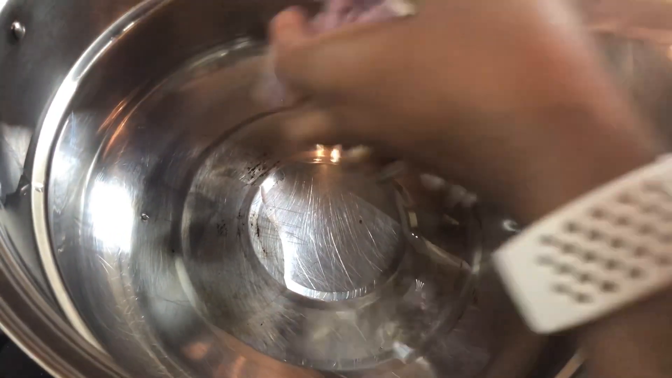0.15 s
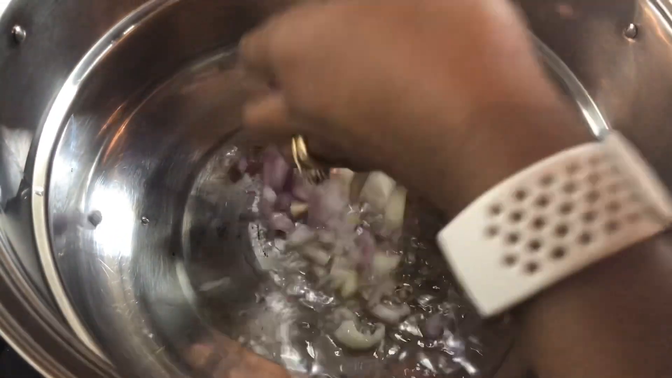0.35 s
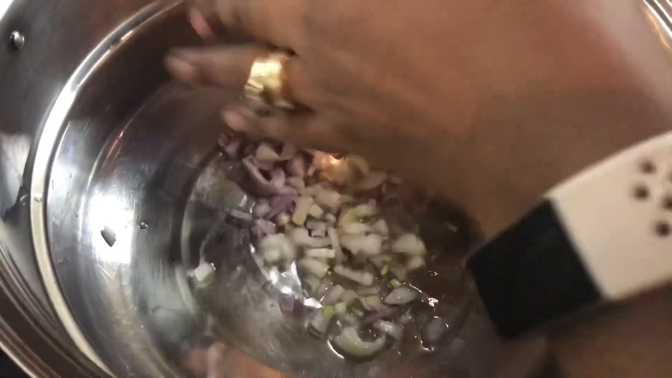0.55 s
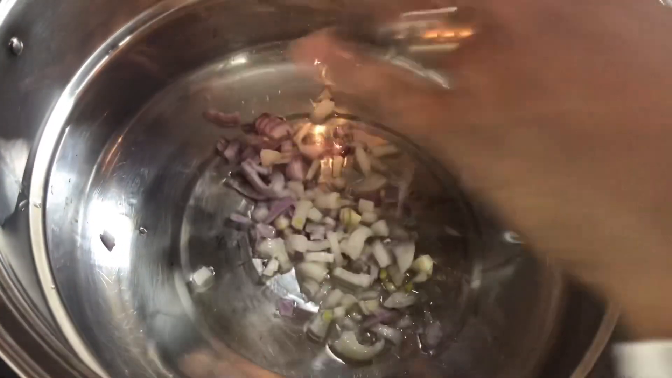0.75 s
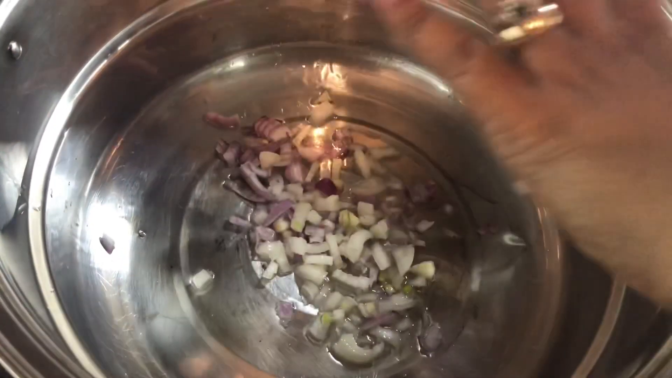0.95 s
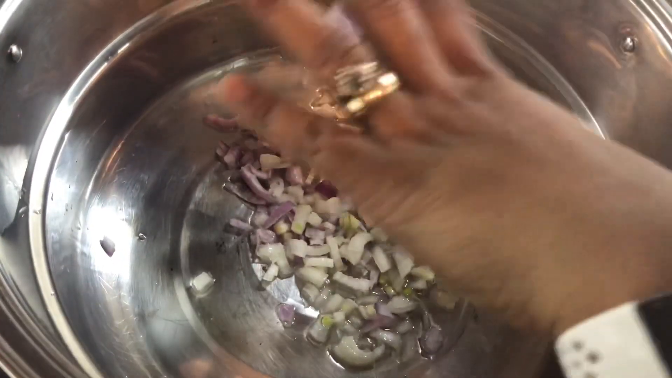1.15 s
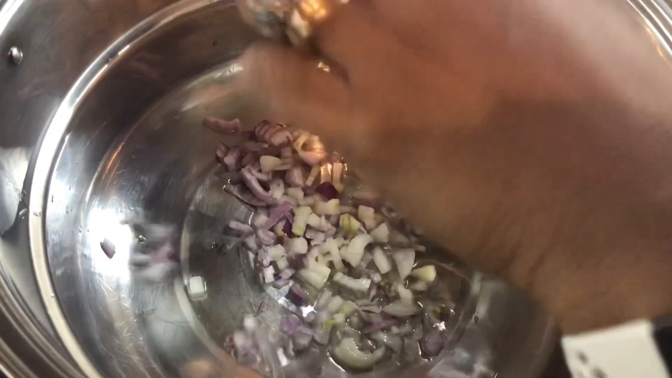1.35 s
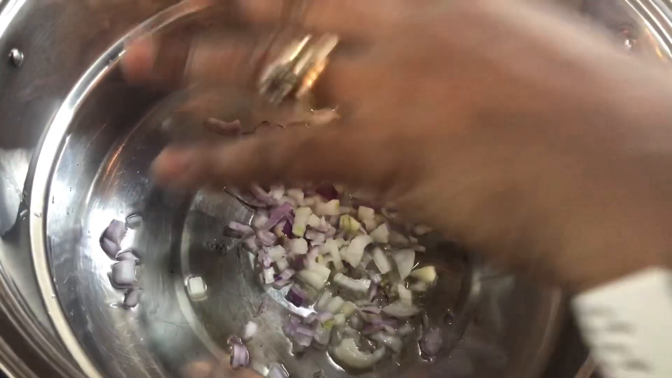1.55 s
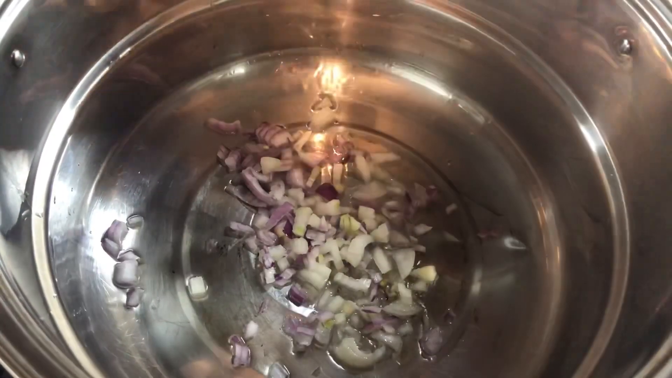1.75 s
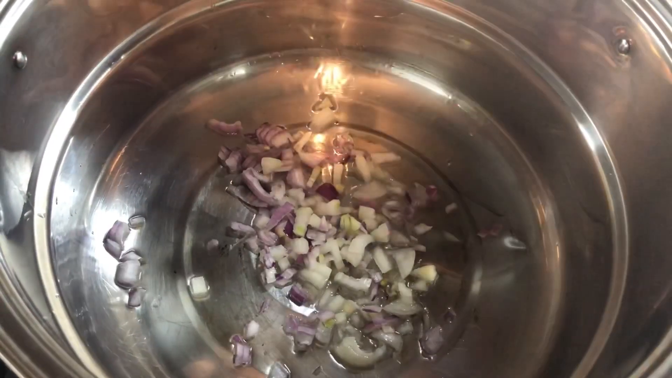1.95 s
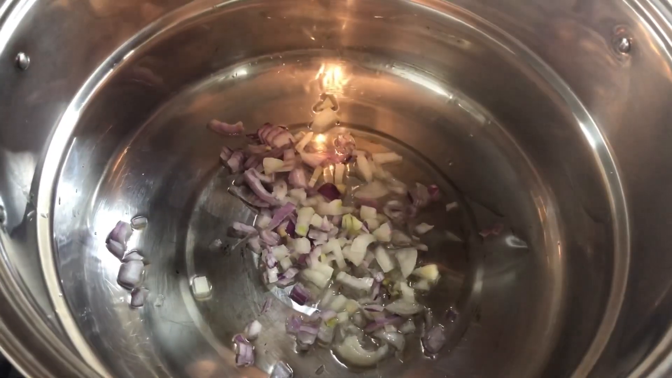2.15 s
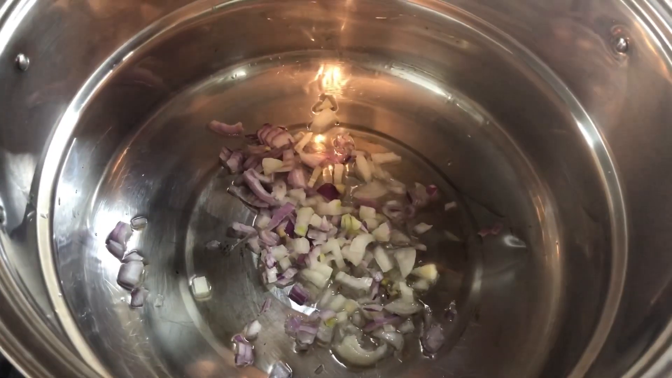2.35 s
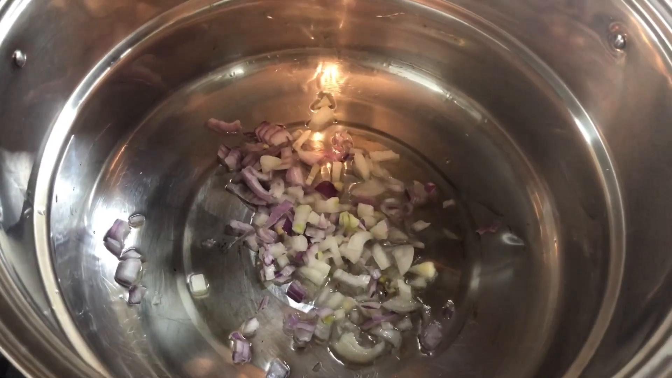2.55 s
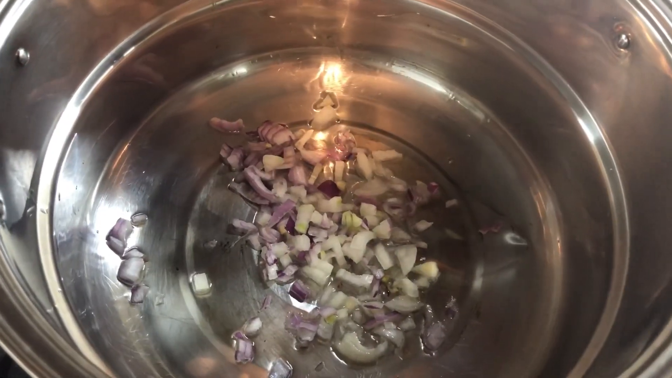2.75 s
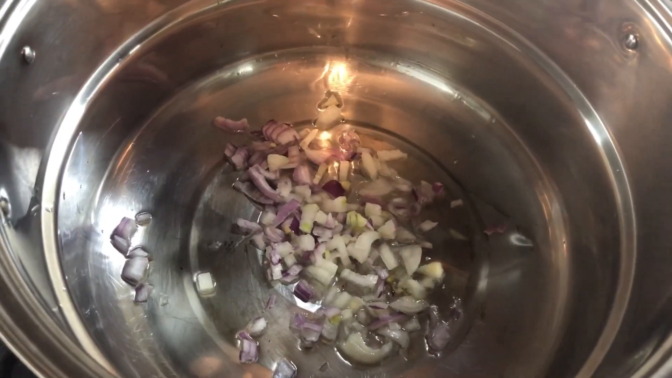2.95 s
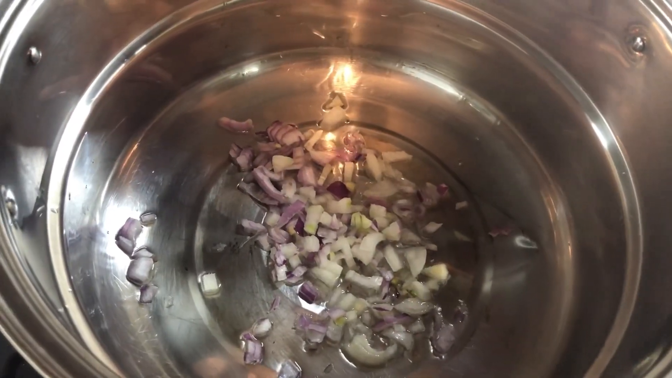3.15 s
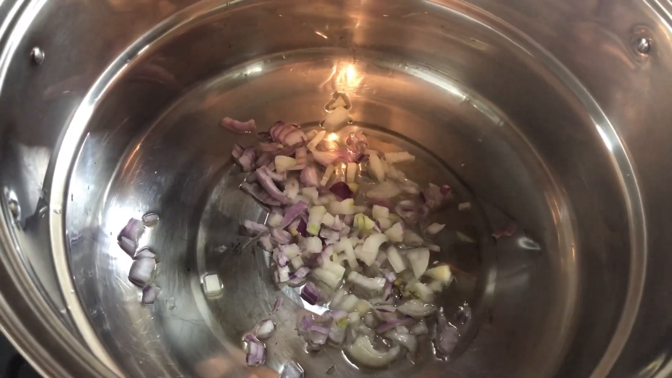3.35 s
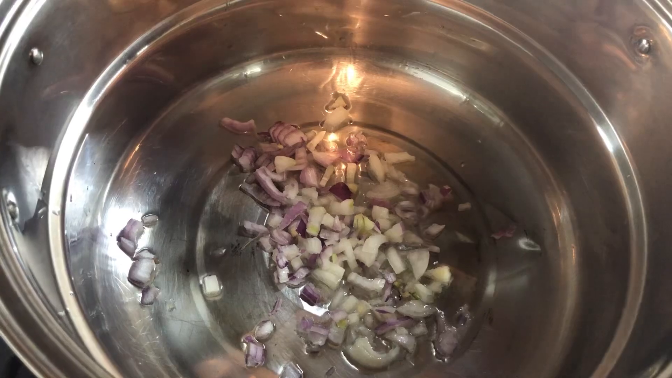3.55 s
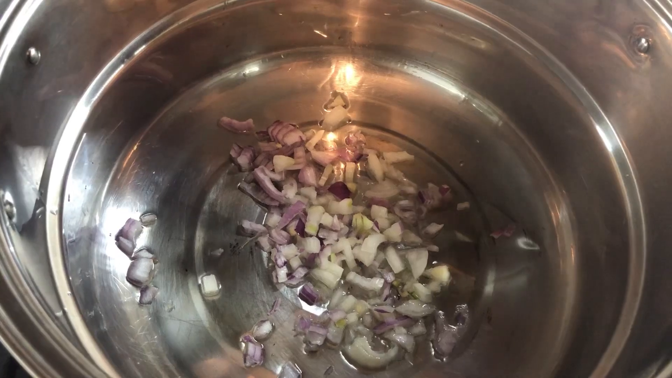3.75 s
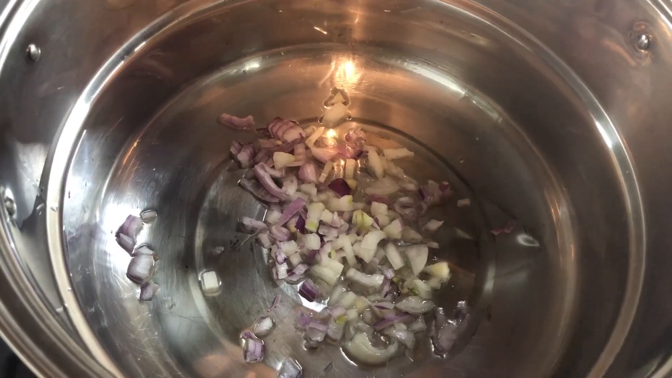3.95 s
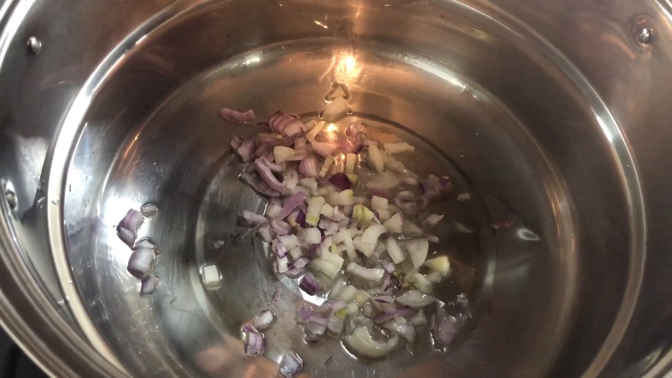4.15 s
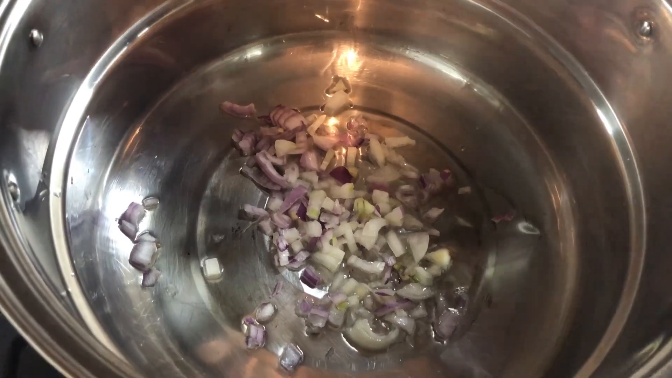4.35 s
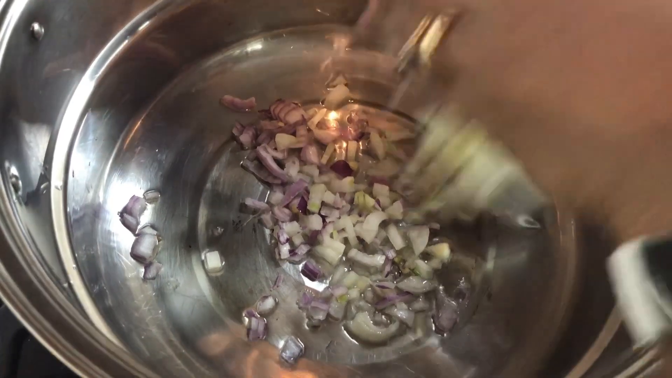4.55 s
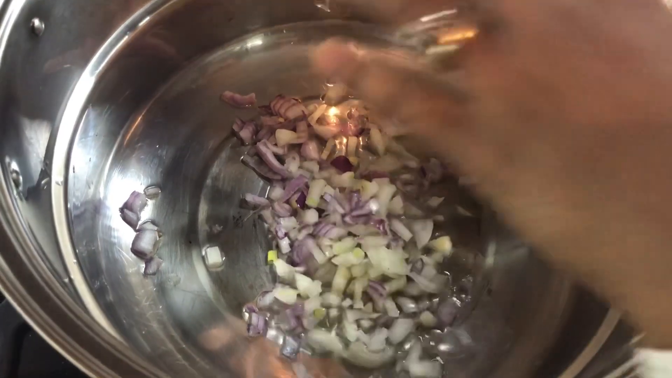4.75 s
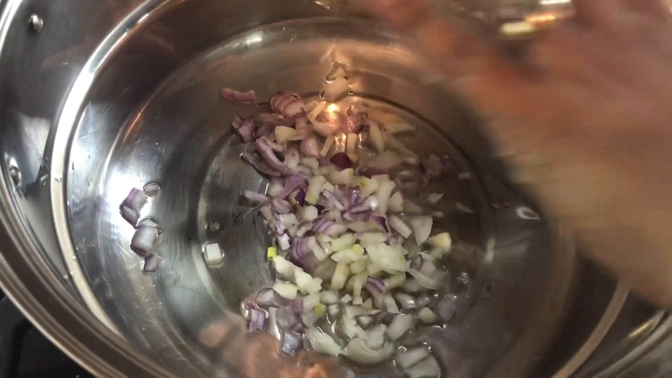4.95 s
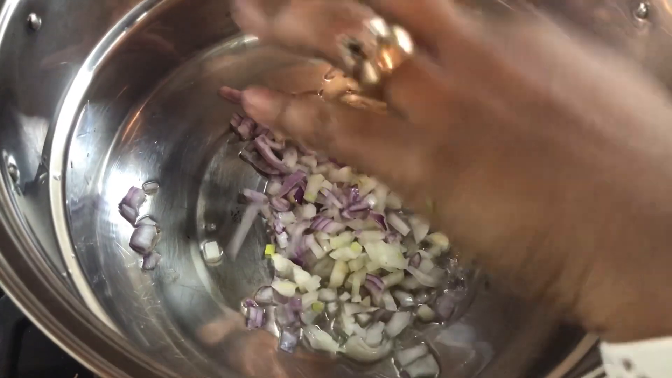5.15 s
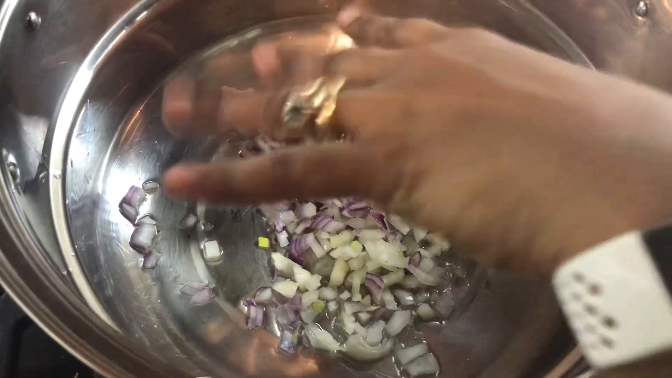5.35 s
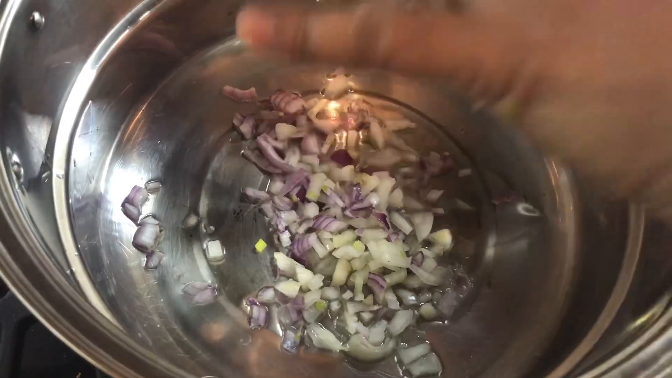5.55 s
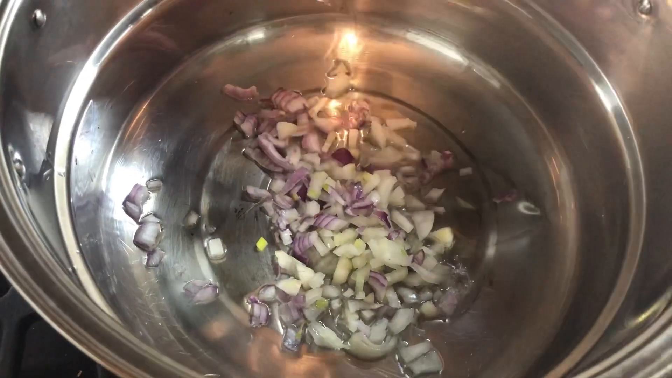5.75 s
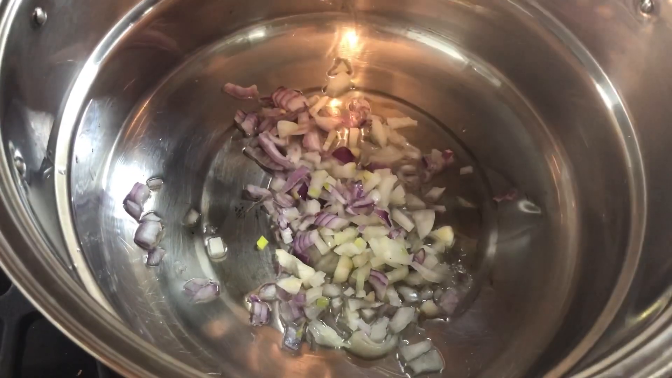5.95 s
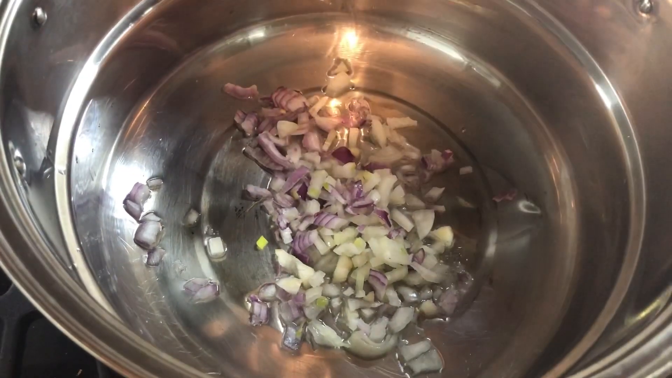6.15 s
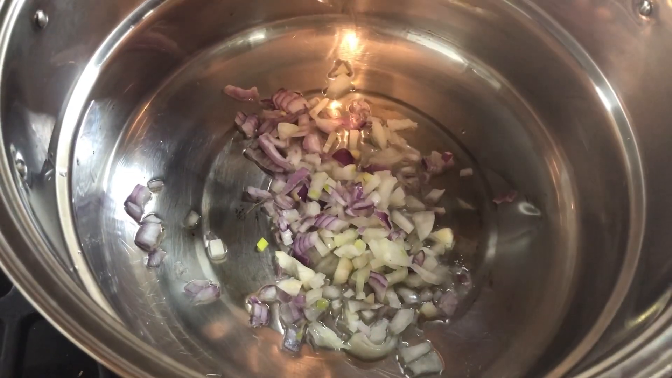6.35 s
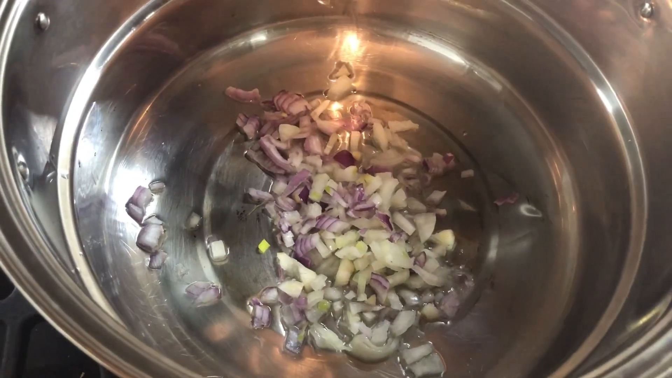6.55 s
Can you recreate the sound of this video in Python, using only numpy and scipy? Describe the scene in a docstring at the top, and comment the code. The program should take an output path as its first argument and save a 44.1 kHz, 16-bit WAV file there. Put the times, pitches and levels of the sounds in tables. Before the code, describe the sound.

Wet onion pieces thud into a wide metal pot, oil flaring into crackling sizzle, with occasional dry knife clacks and woody scrapes beside the stove.

```python
"""At a kitchen stove, handfuls of chopped onion drop into hot oil in a wide steel pot, heard close up.
The pieces thud on the base with short noise bursts, a boom of the air in the pot and ringing steel.
Their water boils off in a bright sizzle made of countless tiny clicks, and single droplets snap.
Beside the stove a knife clacks down on a board three times and scrapes up more onion, in tiny slips
that ring wood and steel. Low swells of the counter, a burner's soft rush and a faint hum lie below."""
import sys
import numpy as np
from scipy import signal
from scipy.fft import rfft, irfft, next_fast_len
from scipy.io import wavfile
from scipy.ndimage import map_coordinates

SR = 44100
rng = np.random.default_rng(int(sys.argv[2]) if len(sys.argv) > 2 else 0)


def put_to_file(sound):
    """Save the sound as 16-bit audio at rate SR, in the file named by the first command-line argument."""
    columns = np.atleast_2d(sound).T  # one column per channel
    safe = np.clip(columns, -1, 1)
    whole_steps = np.round(safe * 32767)
    wavfile.write(sys.argv[1], SR, whole_steps.astype(np.int16))


N = 290619

# The burner's rush. Each row: frequency in Hz, relative level in dB per Hz.
BURNER_SPECTRUM = [(20, -16), (45, -21), (100, 4.5), (180, -2), (245, 10), (340, -3), (420, -7),
                   (900, -9.5), (1500, -19.5), (5000, -21), (16000, -27.5)]
# The mains hum. Each row: frequency in Hz, level in dB.
HUM_TONES = [(48.6, -75), (97, -73)]

# Wet onion meets the oil and steam flares up. Each row: start in seconds, first flash in dB,
# lasting sizzle in dB, finest spray in dB against the sizzle (all before a fixed trim).
STEAM_FLARES = [(0.162, -46.5, -48, -9), (0.22, -41, -35.5, -2), (0.296, -28, -34, -1.5),
                (0.395, -27, -35, -2), (0.756, -33.5, -37, 0.5), (1.269, -29, -52, -0.5),
                (4.29, -45, -69, -3), (4.69, -39, -51.5, -1.5), (5.19, -41, -69, -2)]
# The sizzle. Each row: frequency in Hz, relative level in dB per Hz.
SIZZLE_SPECTRUM = [(880, -33), (1500, -30), (2000, -13.5), (2100, -9.5), (2290, -15), (2580, -10.5),
                   (3200, -6), (3640, -6), (4480, -0.5), (5620, 0.5), (12600, -5.5), (14000, -2.5),
                   (15800, -6.5)]
# The low simmer. Each row: frequency in Hz, relative level in dB per Hz.
SIMMER_SPECTRUM = [(120, -31), (300, -1.5), (450, -2), (650, -4), (1100, -2), (1500, 1), (2200, -11.5)]
# The air in the pot. Each row: frequency in Hz, width in Hz, relative level in dB.
POT_AIR = [(390.5, 43, -2), (855.5, 32.5, 3.5), (1281, 69, -5), (1750, 160, -7.5), (2310, 300, -10.5)]
# The soft ringing of that air. Each row: time in seconds, level in dB.
AIR_LEVEL = [(0.2, -47.5), (2.0, -56.5), (4.3, -57.5), (5.3, -53.5), (5.52, -51), (5.85, -54.5),
             (6.59, -53)]

# Heavier clumps of onion landing. Each row: start in seconds, strength in dB, favoured pitch in Hz.
CLUMPS = [(0.166, -29.5, 794), (0.22, -12, 391.4), (0.235, -12.5, 789), (0.271, -13.5, 380),
          (0.283, -12.5, 1320), (0.298, -13.5, 390), (0.366, -17, 369), (0.393, -14, 395),
          (0.411, -17.5, 369), (0.461, -18, 377), (0.487, -14, 580), (0.533, -15, 630), (0.767, -21.5, 404),
          (0.794, -21.5, 584), (0.826, -19, 603), (1.192, -26, 385), (1.222, -20.5, 377), (1.265, -16, 382),
          (1.28, -19, 460), (1.301, -17.5, 383), (4.623, -20.5, 810), (4.633, -15.5, 370),
          (4.665, -21, 380), (4.686, -24.5, 388), (5.187, -19, 850)]
# Handfuls of loose pieces. Each row: start in seconds, end in seconds, typical strength in dB,
# middle favoured pitch in Hz.
HANDFULS = [(0.24, 0.38, -16, 700), (4.607, 4.67, -24.5, 593), (5.177, 5.25, -29.5, 404)]
# How much onion cushions a landing, already thick for the first handful.
# Each row: time in seconds, cover from 0 to 1.
ONION_BED = [(0.6, 0.66), (1.25, 0.74), (4.6, 1)]
# The thud of a clump. Each row: frequency in Hz, relative level in dB per Hz.
THUD_SPECTRUM = [(30, -60), (55, -40), (85, -22), (140, -6), (400, -3.5), (800, -7.5), (1300, -3),
                 (2200, -12), (5000, -12.5), (12000, -34)]
# The steel base. Each row: frequency in Hz, relative level in dB, seconds to fade by 60 dB.
STEEL_BASE = [(136.2, 0.5, 0.43), (249, -1, 0.3), (291, -13, 0.53), (374, 1, 0.46), (396.6, 4.5, 0.33),
              (586, -3.5, 0.81), (584, 0.5, 0.26), (653, -8, 0.37), (785.5, 2, 0.17), (854, -32, 0.38),
              (1098, -1, 0.17), (1295, 3.5, 0.24), (1487, -19, .45), (1646, -5, 0.27), (2120, -9, 0.35)]

# The loudest droplets bursting in the oil. Each row: start in seconds, level in dB, pitch in Hz,
# lower tick in dB against the snap.
LOUD_SPITS = [(0.1662, -32, 4940, -22), (0.7761, -15.5, 9700, -12), (0.964, -14.5, 7800, -16.5),
              (1.0706, -23, 9400, -12), (1.1244, -21, 10400, -20), (1.1896, -19, 9300, -15),
              (1.2775, -17, 9400, -9.5), (1.3129, -16, 8300, -17), (1.3395, -18, 10900, -19),
              (1.4345, -18, 11500, -27), (1.472, -18, 7900, -11.5), (1.6628, -23, 10500, -28),
              (1.7238, -23.5, 7860, -22), (2.0283, -24, 10700, -9), (2.1359, -27.5, 8800, -15),
              (3.1259, -30, 5900, -14), (3.433, -24, 7200, -26), (4.0295, -32.5, 11100, -5.5),
              (4.1127, -28.5, 8700, -8), (4.2945, -31, 8400, -17), (4.3262, -31, 7450, -3),
              (4.479, -30.5, 10400, -8), (4.8841, -27, 8600, -9.5), (4.7052, -20, 10800, -15.5),
              (4.76, -24, 10500, -14), (4.7863, -20, 9800, -25), (5.1384, -27, 9000, -16),
              (5.2317, -30, 6000, -6.5), (5.2565, -28, 9700, -18), (5.303, -15.5, 10000, -20),
              (5.3773, -18, 10700, -17), (5.3991, -20.5, 8800, -14), (5.817, -25.5, 6500, -12.5),
              (6.4284, -35.5, 8000, 1)]

# Heavier contacts shake the counter. Each row: start in seconds, strength in dB.
COUNTER_HITS = [(0.28, -39), (0.48, -36), (1.269, -36), (2.232, -40), (3.023, -35.5), (4.631, -27.5),
                (4.674, -38), (6.05, -37), (6.26, -33.5)]
# The counter. Each row: frequency in Hz, relative level in dB, seconds to fade by 60 dB.
COUNTER_MODES = [(83, -1, 0.21), (104, -6.5, 0.21), (133, -5.5, 0.16)]

# The knife meeting the board. Each row: start in seconds, strength in dB, brightness in Hz.
KNIFE_KNOCKS = [(2.2280, -10, 1420), (3.02, -12, 1330), (3.0244, -12, 1050), (6.047, -18, 1160)]
# The board when knocked. Each row: frequency in Hz, width in Hz, relative level in dB.
KNOCKED_BOARD = [(242, 88, -1.0), (490, 280, 1.5), (785, 25, 15.5), (850, 79, 10.5), (1250, 73, 4), (1757, 81, 5.5)]

# Strokes of the knife. Each row: start in seconds, end in seconds, steady drag in dB,
# time of the blade's bite in seconds, bite in dB, time of the hardest push in seconds, push in dB.
KNIFE_STROKES = [(2.294, 2.658, -37.5, 2.46, -36.5, 2.475, -26.5),
                 (3.093, 3.497, -37.5, 3.165, -33, 3.2, -34.5), (6.122, 6.493, -43, 6.185, -47, 6.275, -49)]
# The board when scraped. Each row: frequency in Hz, width in Hz, relative level in dB.
SCRAPED_BOARD = [(268, 65, -13.5), (413, 110, -10), (585, 44, -5.5), (739, 120, -10), (967, 64, 2),
                 (1060, 49, -4.5), (1124, 34, -4), (1310, 60, -5), (1650, 130, -12.5), (2145, 88, -9.5)]
# The blade. Each row: frequency in Hz, width in Hz, relative level in dB.
BLADE_MODES = [(1668, 55, 0), (1800, 90, -11), (2130, 90, -10), (2720, 240, -11), (3250, 200, -14),
               (3860, 400, -12), (4800, 700, -16)]

FLARE_ATTACK_S, FLASH_FALL_DB_PER_S = 0.002, 75
DRYING_S, DRYING_POWER = 0.5, 1.39  # the lasting sizzle thins out as a power of its age
SPRAY_FALL_DB_PER_S = 1.77  # the finest spray goes first

RING_DB, RING_MUTE_DB = -8, 23.5  # the bare steel base, and its loss under a full bed of onion
PIECES_PER_S, PIECE_SPREAD_DB = 40, 1

SMALL_SPITS_PER_S = 10
SMALL_SPIT_DB, SMALL_SPIT_SPREAD_DB = -36.5, 0.5  # typical level in a sizzle of median strength
SMALL_SPIT_GROWS = 0.7  # dB they gain for each dB of sizzle
SMALL_SPIT_HZ, SMALL_TICK_DB = 9700, -17  # middle pitch; tick against the snap

STROKE_ATTACK_S, STROKE_RELEASE_S = 0.035, 0.042
BLADE_DRAG_DB = -10.5  # steel against wood while the blade drags on
SPOT_DB, SPOTS_PER_S = 1.8, 11  # the travelling blade favours now one resonance, now another
BITE_LIFT = 0.17  # share of the drag that the wood loses while only the edge bites
PUSH_RISE_S, PUSH_FALL_S, BITE_WIDTH_S = 0.1, 0.016, 0.045
CHATTER_HZ, CHATTER_WIDTH_HZ = 1050, 450  # a hard push drives mostly the board's middle resonances

TOP_HZ = 15950  # nothing is kept from here up


def amp(db):
    """Turn decibels into a gain."""
    return 10 ** (np.asarray(db) / 20)


def unit(x):
    """Scale x to an average (rms) strength of 1."""
    return x / np.sqrt(np.mean(x ** 2) + 1e-20)


def seconds(size):
    """Give the times of that many samples."""
    return np.arange(size) / SR


def wobble(rate):
    """Draw a smooth random curve with that many knots a second."""
    knots = rng.standard_normal(int(N * rate / SR) + 4)
    return map_coordinates(knots, [seconds(N) * rate])


def add(track, s, sound):
    """Mix a sound into the track at time s."""
    part = track[max(round(s * SR), 0):][:len(sound)]
    part += sound[:len(part)]


def filtered(x, response):
    """Multiply the spectrum of x by a response, given as a function of frequency."""
    m = next_fast_len(len(x) + 8192)
    return irfft(rfft(x, m) * response(np.fft.rfftfreq(m, 1 / SR)), m)[:len(x)]


def colour(points):
    """Make a tone colour by joining spectrum points along a log frequency axis."""
    hz, db = np.transpose(points)
    return lambda f: amp(np.interp(np.log(f + 1), np.log(hz), db))


def resonances(modes):
    """Make a body that rings at its own frequencies; neighbours have opposite signs."""
    def response(f):
        return sum((-1) ** k * amp(db) * 1j * f * width / (hz * hz - f * f + 1j * f * width)
                   for k, (hz, width, db) in enumerate(modes))
    return response


def grains(rate, spread_db):
    """Scatter tiny clicks at random times, with a few larger than the rest."""
    size = amp(spread_db * np.minimum(rng.exponential(size=N), 6))
    present = rng.random(N) < rate / SR
    return unit(present * size * rng.choice([-1, 1], N))


def walls(first, echo, t60):
    """Follow a direct click with quick scatter from the steel wall of the pot."""
    t = seconds(size=1400)
    fade = amp(-60 * t / t60) + amp(-15 - 60 * t / .04)
    scatter = rng.standard_normal(len(t)) * (t > first) * fade
    return (t == 0) + echo * scatter / np.linalg.norm(scatter)


def burst(hz, echo, t60):
    """Burst a bubble: a snap up to an octave and a half wide, scattered in the pot."""
    edges = [hz / 1.7, min(1.7 * hz, 17000)]
    band = signal.butter(2, edges, "bandpass", fs=SR, output="sos")
    snap = signal.sosfilt(band, 1. * (seconds(size=100) == 0))
    return signal.fftconvolve(snap, walls(first=.0004, echo=echo, t60=t60))


def kitchen():
    """The burner's soft rush is coloured noise; the faint mains hum is steady tones."""
    rush = unit(filtered(rng.standard_normal(N), colour(BURNER_SPECTRUM)))
    hum = sum(amp(db) * np.sqrt(2) * np.sin(2 * np.pi * hz * seconds(N)) for hz, db in HUM_TONES)
    return amp(-59.5) * rush + hum


def boiling():
    """Trace sizzle and finest spray in dB: each flare flashes, then dries slowly."""
    power, finest_db = np.full(N, 1e-12), np.full(N, 1e-12)
    for s, flash_db, lasting_db, spray_db in STEAM_FLARES:
        age = np.maximum(seconds(N) - s, 0)
        flash = amp(flash_db - FLASH_FALL_DB_PER_S * age) ** 2
        lasting = amp(lasting_db) ** 2 / (1 + age / DRYING_S) ** DRYING_POWER
        power = power + np.minimum(age / FLARE_ATTACK_S, 1) * (flash + lasting)
        # the newest flare sets the spray
        finest_db = np.where(age > 0, spray_db - SPRAY_FALL_DB_PER_S * age, finest_db)
    return 10 * np.log10(power), finest_db


def crackle(count, pitch_hz):
    """Sum families of small bubbles, each with its own pitch and scatter in the pot."""
    pitches = np.clip(pitch_hz * np.exp(.35 * rng.standard_normal(count)), 2500, 14500)
    total = np.zeros(N)
    for hz in pitches:
        pops = grains(rate=40, spread_db=3.7)
        total += signal.oaconvolve(pops, unit(burst(hz, echo=1.0, t60=0.0075)))[:N]
    return unit(total)


def sizzle():
    """Steam escapes through oil as tiny bubbles and a crackle of larger ones; fresh onion is brighter."""
    sizzle_db, spray_db = boiling()
    surge_db = 0.13 * wobble(7) + .5 * wobble(25) + 0.49 * wobble(140)
    fizz = unit(filtered(grains(rate=7000, spread_db=2.8), colour(SIZZLE_SPECTRUM)))
    bubbles = fizz + amp(-6) * crackle(count=14, pitch_hz=7500)
    # the spray is the treble, fading in from 8 to 11 kHz
    spray = filtered(bubbles, lambda f: np.clip((f - 8000) / 3000, 0, 1))
    return amp(sizzle_db + surge_db + 1.86) * (bubbles - spray + amp(spray_db + 2.0) * spray)


def hollow():
    """Larger bubbles simmer low and keep the air in the pot ringing softly."""
    sizzle_db, _ = boiling()
    air_db = np.interp(seconds(N), *np.transpose(AIR_LEVEL))
    air = unit(filtered(rng.standard_normal(N), resonances(POT_AIR)))
    simmer = unit(filtered(grains(rate=1700, spread_db=0.5), colour(SIMMER_SPECTRUM)))
    started = seconds(N) > STEAM_FLARES[0][0]
    return started * (amp(air_db) * air + amp(sizzle_db - 14.5) * simmer)


def loose_pieces():
    """Single pieces fall at uneven moments for as long as a handful is poured."""
    pieces = []
    for start, end, db, hz in HANDFULS:
        times = np.arange(start, end, 1 / PIECES_PER_S)
        chance = rng.standard_normal(size=(20, 3))
        for s, (late, strong, high) in zip(times, chance):
            moment = s + .2 * late / PIECES_PER_S
            pieces.append((moment, db + PIECE_SPREAD_DB * strong, hz * np.exp(0.66 * high)))
    return pieces


def landings():
    """Wet clumps patter down: a dull thud, a boom of the air in the pot and a ring of its base."""
    out, t = np.zeros(N), seconds(size=SR // 2)
    rise = 1 - np.exp(-t / 0.004)
    for s, db, hz in CLUMPS + loose_pieces():
        # the spot where a clump lands favours some modes over others
        favour = lambda f: amp(-2.6 * np.abs(np.log2((f + 1) / hz)))
        # a bed of onion dulls the blow, mutes the steel and leaves mostly the boom
        cover = np.interp(s, *np.transpose(ONION_BED))
        cushion = lambda f: 1 / np.sqrt(1 + (cover * f / 750) ** 4)

        fade = amp(-60 * t / 0.058) + amp(-22 - 60 * t / .45)
        patter = rng.standard_normal(len(t)) * rise * fade
        thud = filtered(patter, lambda f: colour(THUD_SPECTRUM)(f) * favour(f) * cushion(f))

        air = [(f, width, level - (6 + 6 * cover) * abs(np.log2(f / hz))) for f, width, level in POT_AIR]
        boom = filtered(1. * (t == 0), resonances(air))

        ring = np.zeros(len(t))
        chance = rng.standard_normal((len(STEEL_BASE), 2))
        for (f, level, t60), (strong, phase) in zip(STEEL_BASE, chance):
            strength = favour(f) ** 1.4 * amp(level + 2 * strong - 60 * t / t60)
            ring += strength * np.sin(2 * np.pi * (f * t + phase))

        add(out, s, amp(db - 13 - 7.4 * cover) * thud / np.std(thud[:600]))
        add(out, s, amp(db - 7.5 + 2.4 * cover) * boom / np.abs(boom).max())
        add(out, s, amp(db + RING_DB - RING_MUTE_DB * cover) * rise * ring)
    # the pot is too small to radiate deep bass
    return signal.sosfilt(signal.butter(4, 80, "highpass", fs=SR, output="sos"), out)


def small_spits():
    """Lesser droplets go off at random, stronger where the sizzle is fiercer."""
    sizzle_db, _ = boiling()
    usual_db = SMALL_SPIT_DB + SMALL_SPIT_GROWS * (sizzle_db - np.median(sizzle_db))
    gaps, chance = rng.exponential(size=120), rng.standard_normal(size=(120, 2))
    times = STEAM_FLARES[0][0] + np.cumsum(gaps) / SMALL_SPITS_PER_S
    droplets = []
    for s, (strong, high) in zip(times, chance):
        if s < N / SR:
            db = usual_db[int(s * SR)] + SMALL_SPIT_SPREAD_DB * strong
            droplets.append((s, db, SMALL_SPIT_HZ * np.exp(0.27 * high), SMALL_TICK_DB))
    return droplets


def spits():
    """Single droplets explode with a sharp snap and a lower tick."""
    out = np.zeros(N)
    for s, db, hz, tick_db in LOUD_SPITS + small_spits():
        snap = burst(hz, echo=.9, t60=.006)
        tick = burst(hz / 3.2, echo=1.2, t60=.012)
        # both are levelled by their first 3 ms
        pop = snap / np.std(snap[:132]) + amp(tick_db) * tick / np.std(tick[:132])
        add(out, s, amp(db) * pop)
    return out


def thumps():
    """The counter answers a heavy contact with a short low swell of fading tones."""
    out, t = np.zeros(N), seconds(size=SR // 2)
    swell = (1 - np.exp(-t / 0.019)) ** 2
    for s, db in COUNTER_HITS:
        modes = sum(amp(level - 60 * t / t60) * np.sin(2 * np.pi * (hz * t + rng.random()))
                    for hz, level, t60 in COUNTER_MODES)
        add(out, s, amp(db) * swell * modes)
    return out


def knocks():
    """The knife clacks drily on the board: brief noise, both plain and through the ringing wood."""
    out, t = np.zeros(N), seconds(size=SR // 2)
    for s, db, hz in KNIFE_KNOCKS:
        fade = amp(-60 * t / 0.019) + amp(-19.5 - 60 * t / 0.33)
        contact = rng.standard_normal(len(t)) * fade
        clack = filtered(contact, lambda f: resonances([(hz, 1.9 * hz, 0)])(f) ** 2 * (f < 3.2 * hz))
        body = filtered(contact, resonances(KNOCKED_BOARD))
        knock = amp(-13.0) * clack / np.std(clack[:300]) + amp(-18.5) * body / np.std(body[:600])
        add(out, s, amp(db) * knock)
    return out


def rubbed(modes, rate, spread_db):
    """Tiny slips ring a body; its resonances trade strength as the contact moves."""
    pulses, total = grains(rate, spread_db), np.zeros(N)
    for k, mode in enumerate(modes):
        strength = amp(SPOT_DB * wobble(SPOTS_PER_S))
        total += (-1) ** k * strength * filtered(pulses, resonances([mode]))
    return unit(total)


def scrapes():
    """The blade bites, is pushed home and drags over the board; tiny slips ring wood and steel."""
    out, t = np.zeros(N), seconds(N)
    slips = amp(1.5 * wobble(45))  # unevenness shared by all three layers
    wood = unit(slips * rubbed(SCRAPED_BOARD, rate=3100, spread_db=1.5))
    edge = unit(slips * rubbed(BLADE_MODES, rate=2500, spread_db=4.0))
    pushed_wood = rubbed(SCRAPED_BOARD, rate=3100, spread_db=1.5)
    middle = resonances([(CHATTER_HZ, CHATTER_WIDTH_HZ, 0)])
    chatter = unit(slips * filtered(pushed_wood, middle))
    for start, end, drag_db, bite_s, bite_db, push_s, push_db in KNIFE_STROKES:
        fade_in = np.clip((t - start) / STROKE_ATTACK_S, 0, 1)
        fade_out = np.clip(1 - (t - end) / STROKE_RELEASE_S, 0, 1)
        bite = np.exp(-.5 * ((t - bite_s) / BITE_WIDTH_S) ** 2)
        push = np.exp(-np.maximum((push_s - t) / PUSH_RISE_S, (t - push_s) / PUSH_FALL_S))
        board = amp(drag_db) * (1 - BITE_LIFT * bite)
        blade = np.hypot(amp(drag_db + BLADE_DRAG_DB), amp(bite_db) * bite)
        out += fade_in * fade_out * (board * wood + blade * edge + amp(push_db) * push * chatter)
    return out


def room(x, t60):
    """The kitchen's short reverberation: x smeared by a fading noise tail."""
    t = seconds(size=SR // 2)
    tail = rng.standard_normal(len(t)) * amp(-60 * t / t60) * (t > .006)
    return signal.fftconvolve(x, tail / np.linalg.norm(tail))[:N]


def scene():
    """The pot is close; the board lies farther off, with more room."""
    pot = sizzle() + hollow() + spits() + landings()
    board = knocks() + scrapes() + thumps()
    near = pot + amp(-13) * room(pot, t60=0.41)
    far = board + amp(-9.5) * room(board, t60=0.3)
    return (near + far + kitchen())[None]


def record(dry):
    """Cut away everything from the top frequency up."""
    return np.array([filtered(channel, lambda f: f < TOP_HZ) for channel in dry])


dry = scene()
out = record(dry)
put_to_file(out)
```